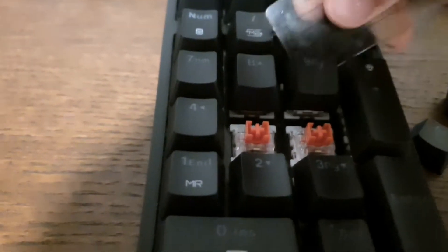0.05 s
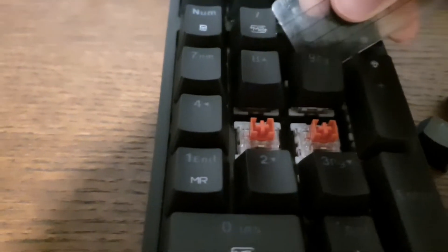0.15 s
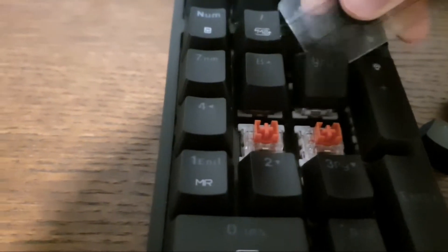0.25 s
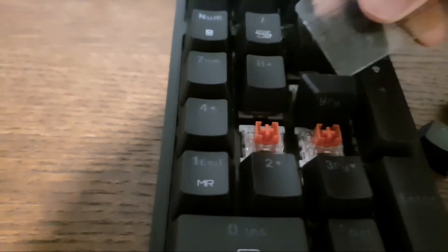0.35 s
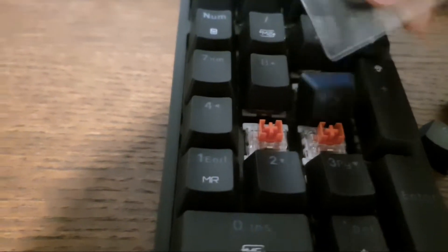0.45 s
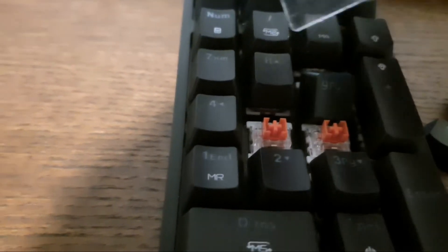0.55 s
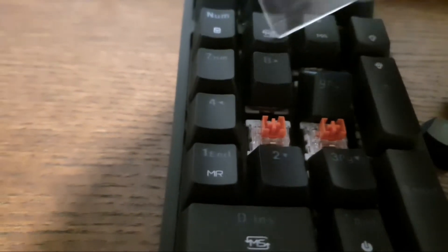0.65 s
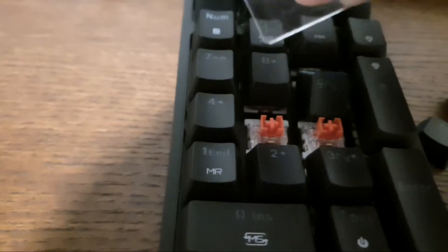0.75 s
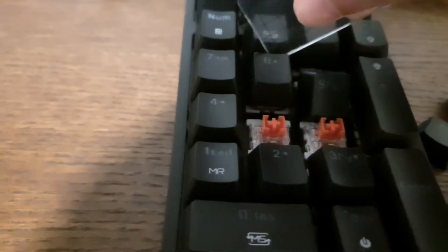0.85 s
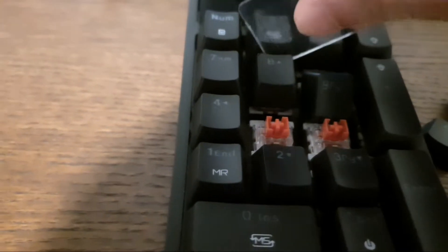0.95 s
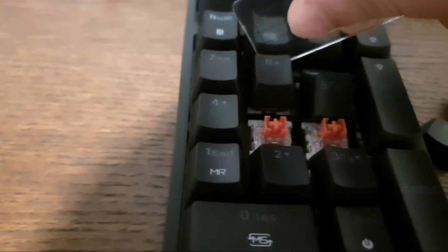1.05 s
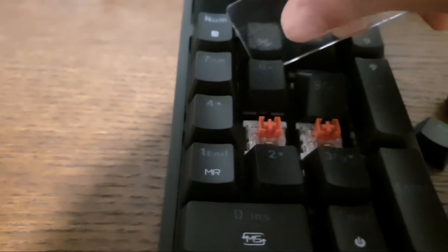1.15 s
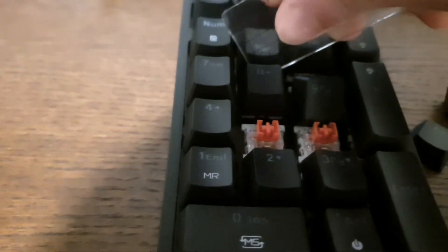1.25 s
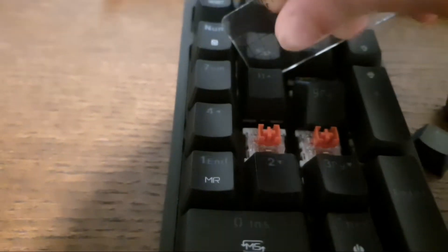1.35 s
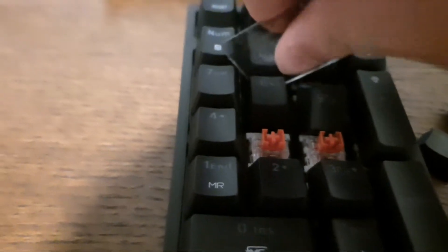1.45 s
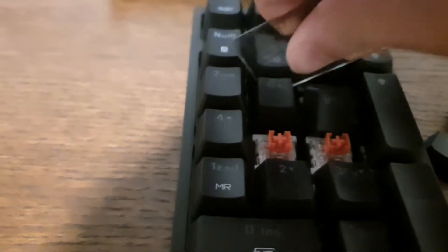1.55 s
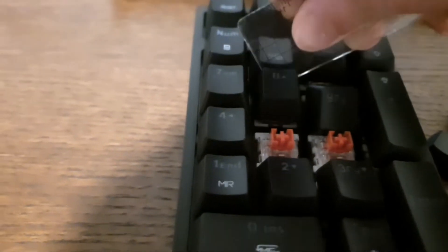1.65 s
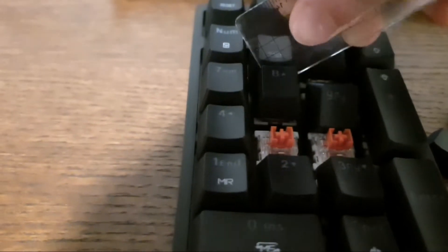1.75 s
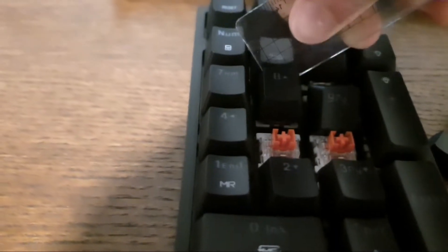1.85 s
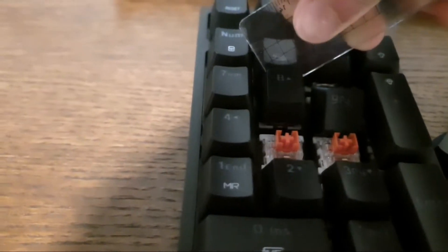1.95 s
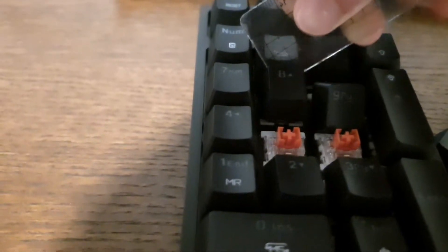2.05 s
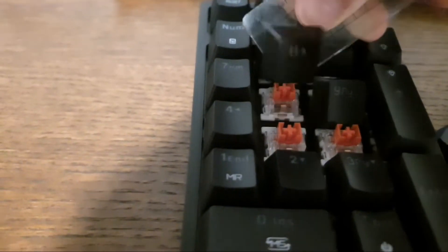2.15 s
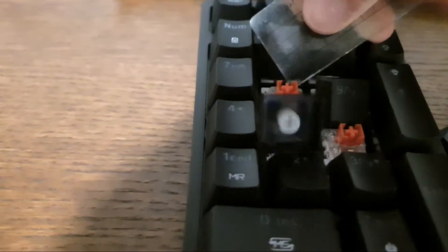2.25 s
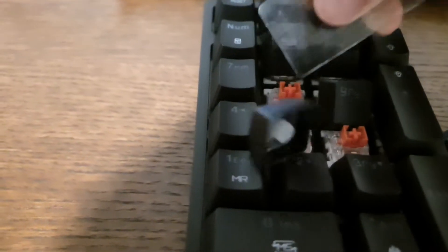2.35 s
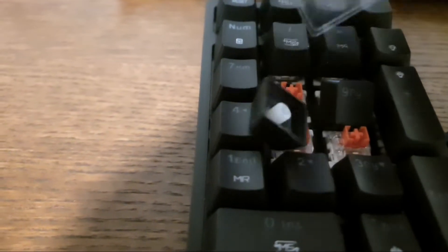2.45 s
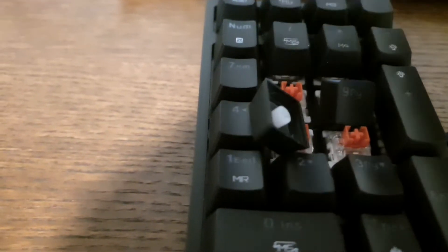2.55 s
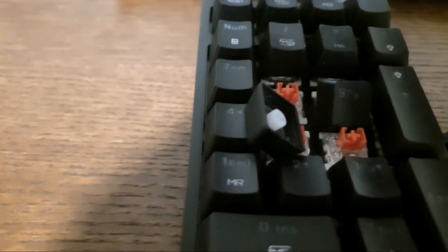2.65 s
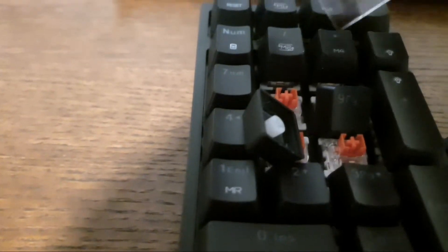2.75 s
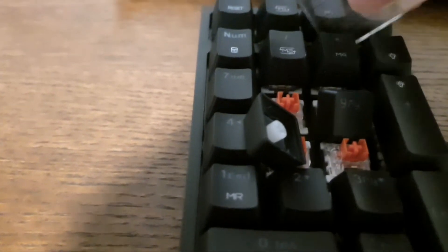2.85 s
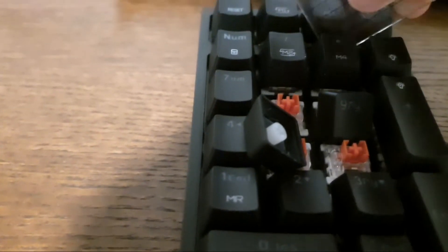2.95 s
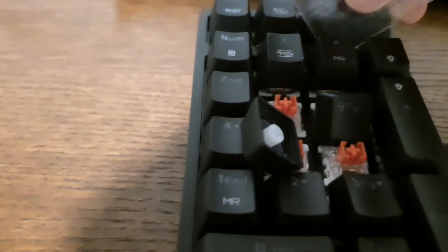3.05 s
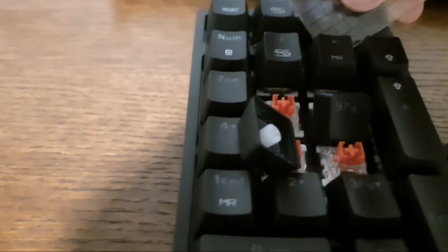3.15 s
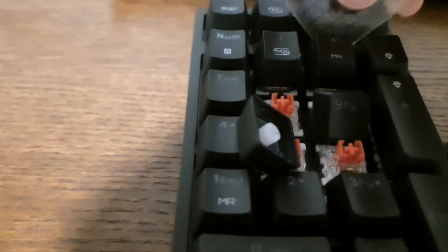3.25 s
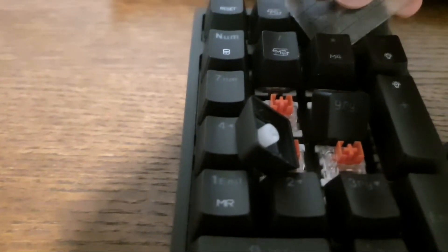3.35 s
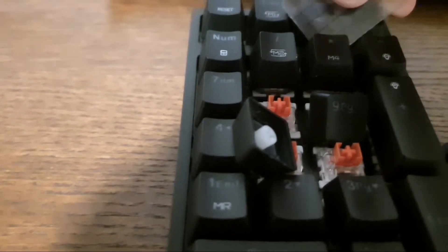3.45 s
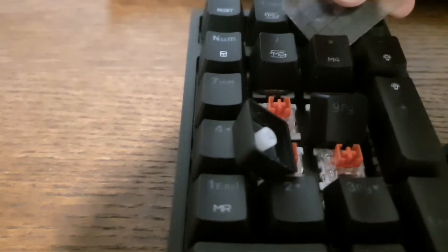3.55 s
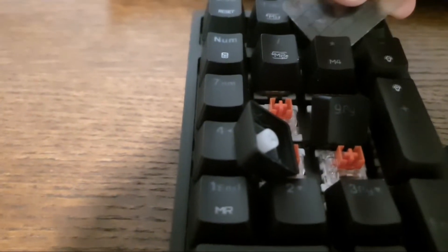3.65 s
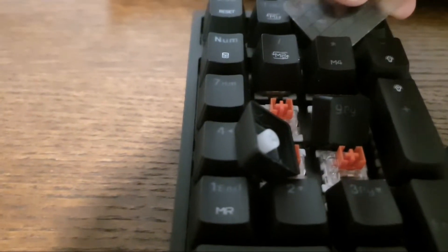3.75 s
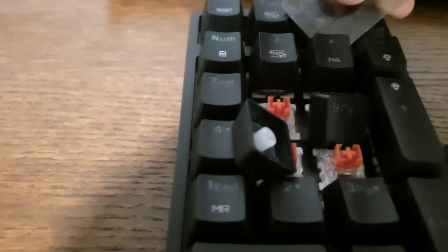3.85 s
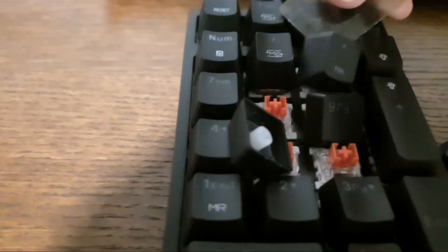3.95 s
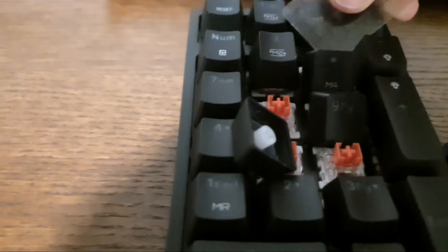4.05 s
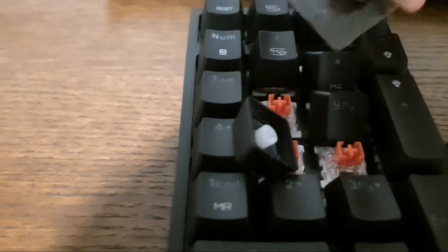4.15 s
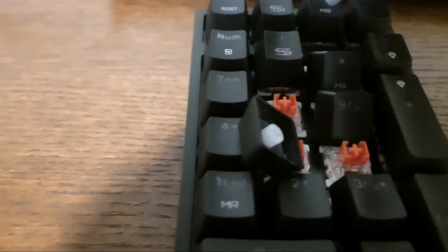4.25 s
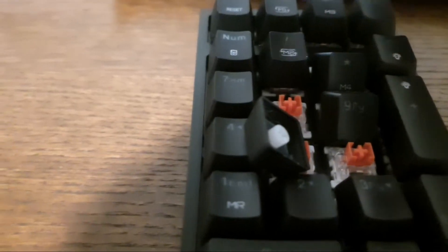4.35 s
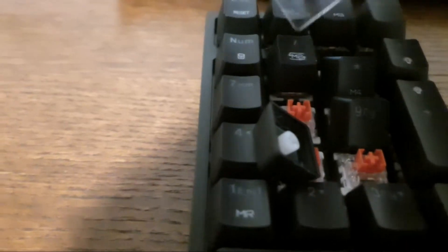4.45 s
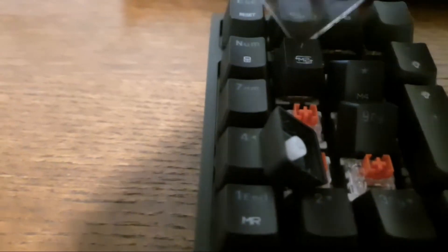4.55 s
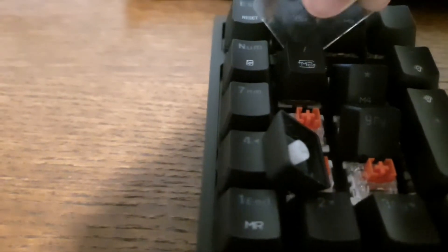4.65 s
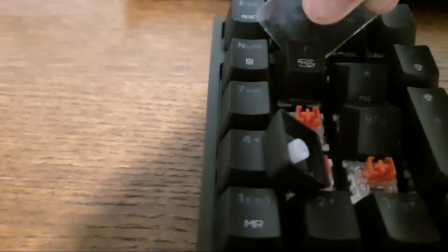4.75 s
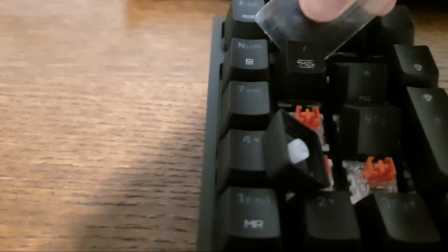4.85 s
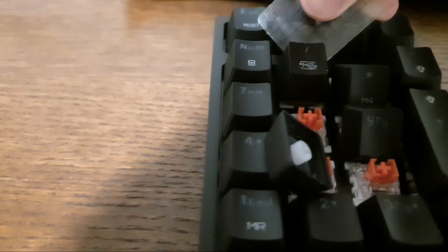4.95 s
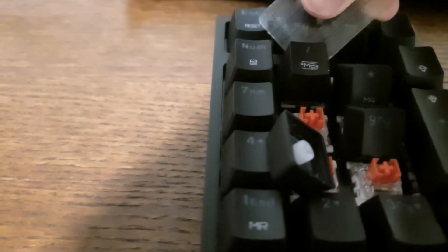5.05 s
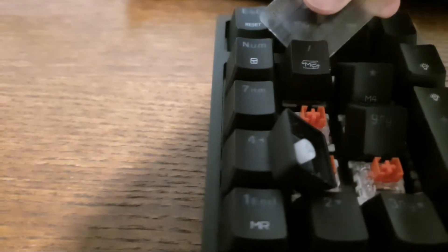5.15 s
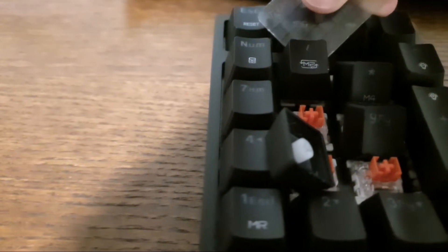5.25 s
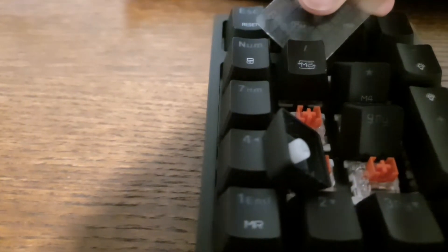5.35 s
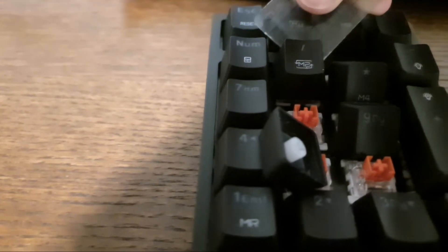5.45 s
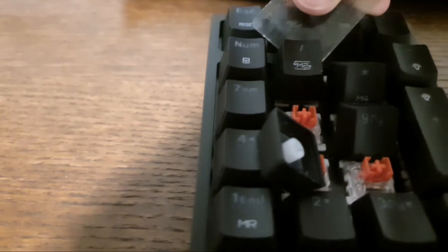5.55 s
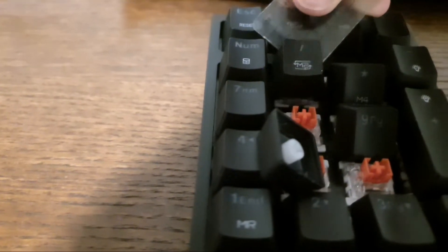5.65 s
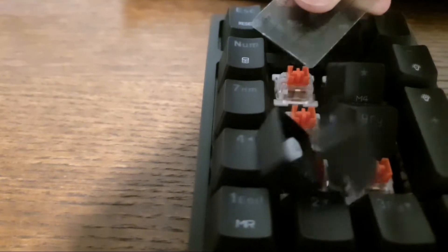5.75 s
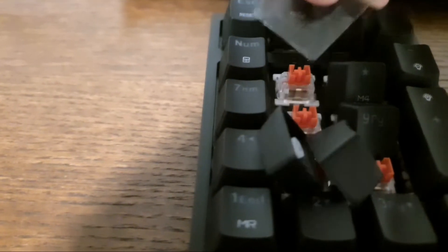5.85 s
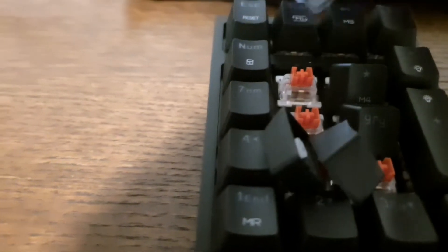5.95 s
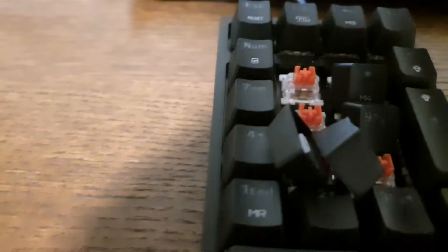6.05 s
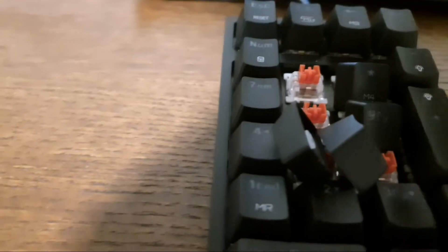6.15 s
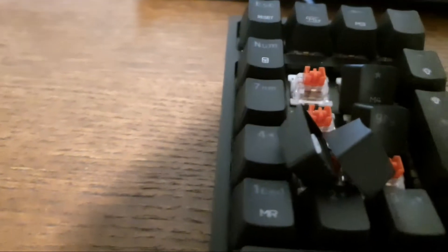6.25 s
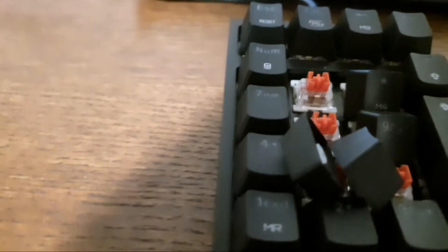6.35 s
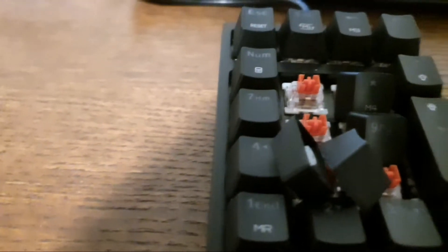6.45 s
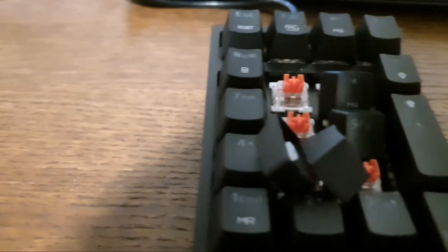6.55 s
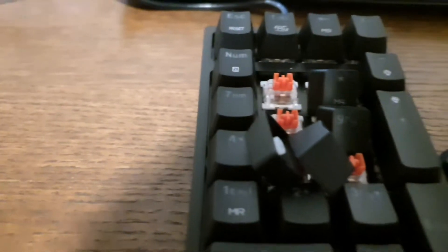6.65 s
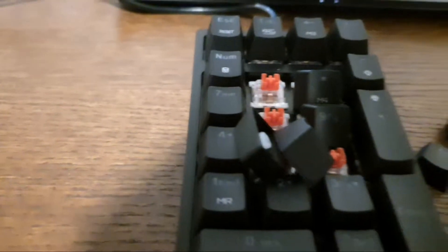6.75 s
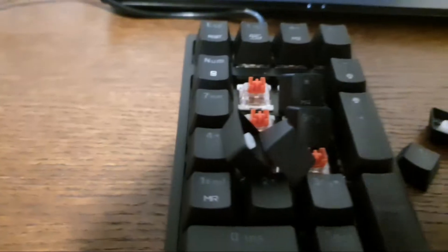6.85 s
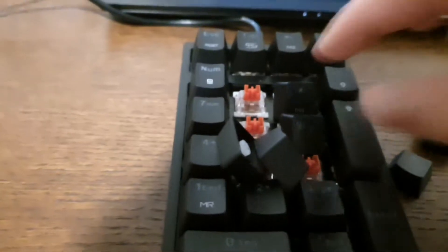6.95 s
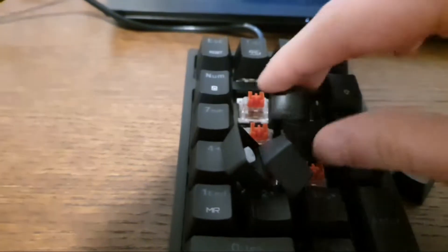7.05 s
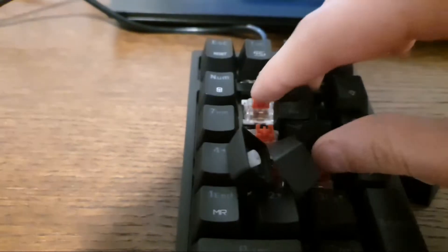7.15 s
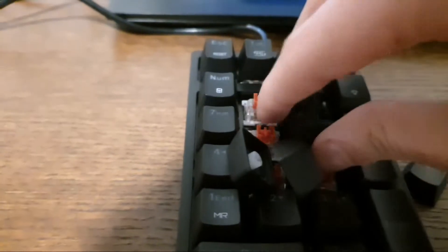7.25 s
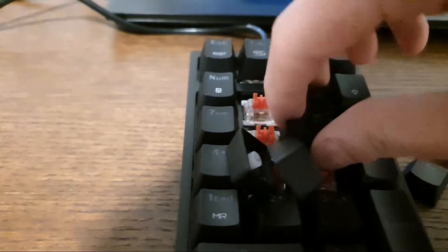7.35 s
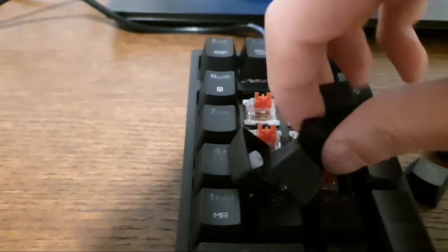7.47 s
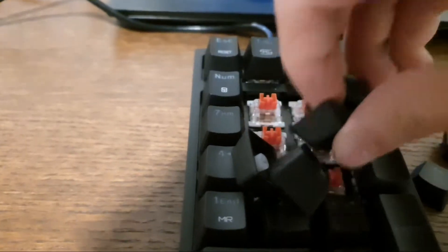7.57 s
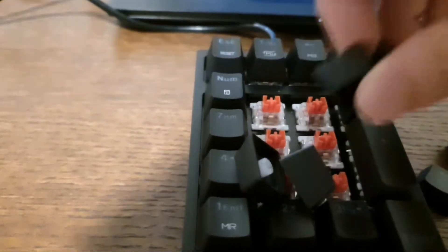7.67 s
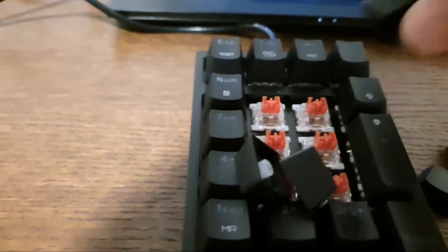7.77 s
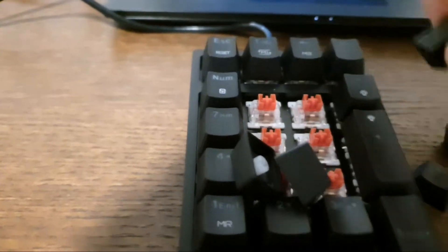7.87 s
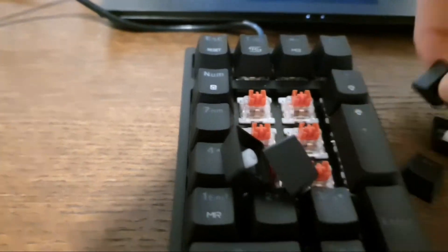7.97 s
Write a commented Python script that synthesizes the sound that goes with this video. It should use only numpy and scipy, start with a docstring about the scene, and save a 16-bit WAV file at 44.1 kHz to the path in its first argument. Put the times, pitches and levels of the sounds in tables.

```python
"""Keycaps are levered off a mechanical keyboard with a clear plastic card, close by in stereo.
Clicks are short noisy contacts that ring groups of decaying modes; scrapes are random slips through the same modes.
Thuds are decaying low desk modes, with filtered-noise rumble below; a few case notes are single fading sines.
A small room answers with decaying noise, over shaped hiss, low hum and a faint whine of wavering sines."""
import sys
import numpy as np
from scipy import signal
from scipy.fft import rfft, irfft
from scipy.io import wavfile
from scipy.ndimage import uniform_filter1d

SR = 44100
rng = np.random.default_rng(int(sys.argv[2]) if len(sys.argv) > 2 else 0)


def bounce(signal):
    """Save signal as a 16-bit WAV file at the path given by the first command-line argument."""
    frames = np.transpose(np.atleast_2d(signal))
    limited = np.clip(frames, -1, 1)
    pcm = np.round(limited * 32767).astype(np.int16)
    wavfile.write(sys.argv[1], SR, pcm)


N = 353196


def undb(db):
    """Gain of a level in dB."""
    return 10 ** (np.asarray(db) / 20)


def unit(x):
    """Scaled to rms 1."""
    return x / np.sqrt(np.mean(x ** 2))


def band(x, hz, width_hz):
    """One resonance, gain 1 at the centre."""
    return signal.lfilter(*signal.iirpeak(hz, hz / width_hz, fs=SR), x)


def curve(rows):
    """A level curve at every sample."""
    return np.interp(np.arange(N) / SR, *np.transpose(rows))


def along(table, hz):
    """A (f/Hz, value) table read on a log-frequency axis."""
    table = np.array(table)
    return np.interp(np.log(hz), np.log(table[:, 0]), table[:, 1])


def walk(rate_hz):
    """Random levels held for 1 / rate and slewed twice; spread near 1."""
    k = int(SR / rate_hz)
    steps = np.repeat(rng.standard_normal(N // k + 1), k)
    return 1.48 * uniform_filter1d(uniform_filter1d(steps, k), k)[:N]


def add(out, sound, s):
    """Mixes a sound in at time s."""
    i = int(s * SR)
    out[:, i:i + sound.shape[1]] += sound[:, :max(N - i, 0)]


# stereo balance of the keyboard: (f/Hz, left minus right level/dB)
LEFT_OVER_RIGHT = [(300, 0.5), (700, 8.5), (1500, 6.5), (3000, 8.5), (6000, 12.5), (9000, 3.5), (13000, 2)]


def lean(hz, off_db=0):
    """Gains of the two sides for a sound of the keyboard, which favours the left by frequency."""
    half_db = (along(LEFT_OVER_RIGHT, hz) + off_db) / 2
    return undb(half_db), undb(-half_db)


# hiss spectrum: (f/Hz, relative density level/dB per Hz)
HISS_SPECTRUM = [(18, -25), (30, -5), (64, 2.5), (165, -8), (210, 5), (259, -14.5), (328, -11.5),
                 (449, -16.5), (1430, -18), (2010, -19), (4910, -20.5), (14800, -21), (16000, -22)]
# how alike left and right hiss are: (f/Hz, likeness 0-1)
HISS_LIKENESS = [(60, 0.83), (300, 0.92), (700, 0.97), (3000, 1), (7000, 1), (15000, 1)]
# faint hum and whine, before their waver: (f/Hz, rms level/dB)
HUM_AND_WHINE = [(59.2, -62), (210, -82), (323, -89), (1868, -82.5), (4000, -85), (5000, -82.5),
                 (6000, -81), (7000, -79), (8000, -80.5), (9000, -81), (10000, -82.5), (11000, -81),
                 (15000, -85)]
HISS_DB = -58.5  # rms


def floor():
    """Smooth hiss, partly shared by both sides, with wavering hum and a whine mostly on whole kilohertz."""
    hz = np.maximum(np.fft.rfftfreq(N, 1 / SR), 1)
    alike = np.clip(along(HISS_LIKENESS, hz), 0, 1)
    noise = rfft(rng.standard_normal((2, N))) * undb(along(HISS_SPECTRUM, hz))
    mid, side = noise * np.sqrt([1 + alike, 1 - alike])
    hiss = irfft(np.array([mid + side, mid - side]), N)
    tones, t = np.zeros(N), np.arange(N) / SR
    for tone_hz, db in HUM_AND_WHINE:
        level = undb(db + 2.1 * walk(6.5)) * np.sqrt(2)  # a sine peaks at sqrt(2) times its rms
        tones += level * np.sin(2 * np.pi * (tone_hz * t + rng.random()))
    return undb(HISS_DB) * unit(hiss) + tones


# rumble without the thuds' share: (t/s, rms level/dB)
RUMBLE = [(0.0, -47.5), (2.0, -56.5), (2.6, -60.5), (3.9, -53.5), (4.3, -62), (5.8, -53.5), (6.15, -65.5),
          (7.0, -66.5), (7.46, -46), (8.0, -75)]
# broad desk resonances, each filtered twice: (f/Hz, width of one pass/Hz, relative level/dB)
DESK_RESONANCES = [(40.2, 21, -15.5), (62, 29.4, -4), (98.5, 58, -5.5), (192, 74, -10.5), (345, 150, -15.5),
                   (504, 320, -18.5)]
SHAKE_AFTER_DB, SHAKE_AFTER_T60_S = -21.5, 0.41  # rumble left by a thud, against its peak


def shake():
    """Uneven low rumble through the desk's broad resonances, stirred up by every thud."""
    shared_db, rumble = 1.5 * walk(12), np.zeros(N)
    for hz, width_hz, db in DESK_RESONANCES:
        mode = unit(band(band(rng.standard_normal(N), hz, width_hz), hz, width_hz))
        rumble += undb(db + 3 * walk(22) + shared_db) * mode
    stirred, t = np.zeros((1, N)), np.arange(SR) / SR
    for s, db, _ in DESK_THUDS:
        add(stirred, undb(db + SHAKE_AFTER_DB - 60 * t[None] / SHAKE_AFTER_T60_S), s)
    return unit(rumble) * (undb(curve(RUMBLE)) + stirred[0])


def swell(rise_s, fall_s):
    """Level that builds, then eases off."""
    ends = np.cumsum([0, max(rise_s, .002), max(fall_s, .01)])
    return np.interp(np.arange(int(ends[-1] * SR)) / SR, ends, [0, 1, 0]) ** 1.5


def gripped(modes, sides):
    """Slips through a group of modes, widened by the grip of the fingers."""
    body = np.zeros((2, N))
    for hz, db, _ in modes:
        mode = band(band(sides, hz, 0.12 * hz), hz, 0.24 * hz)
        body += undb(db) * np.array(lean(hz))[:, None] * mode
    return body


# scrapes of card and fingers: (start t/s, length/s, dull part level at full pressure/dB, treble level above it/dB)
SCRAPES = [(0.042, .08, -47, -15), (0.246, .09, -51.5, -11), (0.315, 0.14, -44, -9), (.5, .13, -43, -19),
           (0.78, 0.38, -54, -23), (1.288, 0.076, -49.5, -19), (1.441, 0.081, -42, -8),
           (2.333, 0.3, -47.5, -27), (2.893, 0.069, -46.5, -9), (3.034, 0.15, -56.5, -27),
           (3.923, 0.14, -44, -6), (4.029, 0.096, -40, -25), (4.141, 0.079, -42.5, -16),
           (4.193, 0.058, -38.5, -17), (4.573, 0.063, -44, -14), (4.677, 0.053, -52, -10),
           (4.754, 0.096, -41.5, -9), (5.373, 0.35, -55.5, -27), (5.819, 0.13, -42.5, -17),
           (6.485, 0.19, -38.5, -9.5), (6.652, 0.051, -34, 8), (6.681, 0.078, -38.5, 9.5),
           (7.175, 0.23, -50.5, -8.5), (7.366, 0.28, -45.5, -9), (7.548, 0.1, -44.5, -0.5),
           (7.644, 0.11, -45, -9)]
RUB_RISE_SHARE = 0.57  # part of a scrape in which the pressure builds
BEFORE_S, AFTER_S = 0.016, 0.082  # a short soft noise swells before each click and fades after it
# that noise against the clack; the duller the click, the less treble
AFTER_DB, AFTER_TREBLE_DB = -24.5, -8


def rub():
    """Dense uneven slips, in flurries, excite the keyboard's modes, in scrapes and softly around each click."""
    flurry_db = 3.5 * walk(160) + 3 * walk(45)
    happens = rng.random(N) < 5000 / SR  # 5000 slips a second on average
    slips = happens * undb(1.97 * np.minimum(rng.exponential(size=N), 4) + flurry_db)
    # partly the same on both sides
    sides = slips * (0.88 * rng.standard_normal(N) + rng.standard_normal((2, N)))
    dull = unit(gripped(KNOCK_MODES, sides) + gripped(CLACK_MODES + CLICK_MODES[:2], sides))
    sharp = unit(gripped(CLICK_MODES[2:], sides) + undb(-4.0) * gripped(TICK_MODES, sides))
    # the push also reaches the desk
    dull = dull + undb(-11.5) * unit(band(band(sides.mean(axis=0), 146, 116), 244, 145))
    strokes = []
    for s, long_s, db, treble_db in SCRAPES:
        strokes.append((s, RUB_RISE_SHARE * long_s, (1 - RUB_RISE_SHARE) * long_s, db, treble_db))
    for s, db, _, sharp_db in PLASTIC_CLICKS:
        strokes.append((s - BEFORE_S, BEFORE_S, AFTER_S, db + AFTER_DB, AFTER_TREBLE_DB + sharp_db))
    press = np.zeros((2, N))  # rows: dull, sharp
    for s, rise_s, fall_s, db, treble_db in strokes:
        add(press, np.outer(undb([db, db + treble_db]), swell(rise_s, fall_s)), s)
    return press[0] * dull + press[1] * sharp


# noise bands of the room's tail: (f/Hz, width/Hz, t60/s, starting level/dB)
ROOM_BANDS = [(473, 383, 0.27, -28), (1940, 1100, 0.26, -39), (4850, 3200, 0.2, -43.5),
              (11200, 14500, 0.41, -46)]


def room(x):
    """Dense echoes that build within milliseconds and die band by band, unrelated left and right."""
    t = np.arange(SR // 2) / SR
    tail = np.zeros((2, len(t)))
    for hz, width_hz, t60_s, db in ROOM_BANDS:
        tail += undb(db - 60 * t / t60_s) * band(rng.standard_normal((2, len(t))), hz, width_hz)
    return signal.fftconvolve(x, tail * (1 - np.exp(-t / 0.002)), axes=1)[:, :N]


HELD_SHARE, HELD_DB = 0.4, 6  # modes damped by fingers and neighbours: shortest share of t60, and their gain
APART_HZ = 1490  # below this the two sides hear a mode nearly in step


def ring(modes, contact, count, off_db, lag_s, scatter_db=3.0, detune=0.075, apart_rad=1.23):
    """A contact rings close groups of modes; each blow lands elsewhere, so sizes, pitches and paths differ."""
    hz, db, t60 = np.repeat(modes, count, axis=0).T[:, :, None]
    size, tune, turn, apart = rng.standard_normal((4, len(hz), 1))
    t = np.arange(int(SR * t60.max())) / SR
    hz = hz * (1 + detune * tune)
    held = rng.random(hz.shape)
    db, t60 = db + HELD_DB * held, t60 * HELD_SHARE ** held
    # a mode needs about a cycle to build up
    fade = undb(db + scatter_db * size - 60 * t / t60) * (1 - np.exp(-2.5 * hz * t))
    gap = 2 * np.pi * hz * lag_s + apart_rad * apart * hz / (hz + APART_HZ)
    left, right = lean(hz, off_db)
    phase = 2 * np.pi * (hz * t + 0.23 * turn)
    left_sum = np.sum(left * fade * np.sin(phase), axis=0)
    right_sum = np.sum(right * fade * np.sin(phase - gap), axis=0)
    pair = signal.fftconvolve(np.array([left_sum, right_sum]), contact[None], axes=1)
    return pair / np.abs(pair.mean(axis=0)).max()


# plastic on plastic: (t/s, clack peak level/dB, knock level above it/dB, sharpness/dB)
PLASTIC_CLICKS = [(.0872, -39, 0, 0), (.0937, -40, -2.5, 0), (0.2924, -44.5, -1, -0.5),
                  (0.3084, -41.5, -2.5, -5), (.3676, -41, -13, -1), (0.3855, -33.5, -5, -1),
                  (0.4054, -27, -27, 5.5), (.4189, -29.5, -31, 1.5), (.4334, -20.5, -20, 0.5),
                  (0.5193, -33, -22, -0.5), (0.5326, -32, -27, 2.5), (.5427, -35, -25, 4),
                  (0.557, -42, -10, 2), (.5714, -42, -7, 3), (.5906, -44, -22, 5),
                  (0.6013, -41.5, -14, 6.5), (0.7185, -32, -9, -6.5), (0.7949, -30.5, -21, -8),
                  (.827, -42.5, 3, 3), (0.8584, -15.5, -13, 0.5), (1.034, -49.5, 6, -6),
                  (1.0565, -43, -1, -10), (1.2403, -46, 7.5, -8), (1.3072, -45.5, 1.5, -5),
                  (1.3297, -45, -5, 1.5), (1.3468, -39.5, -5, -2), (1.4676, -39, 7, -12),
                  (1.4852, -35.5, 6.5, -5), (1.5015, -24, 0, -18), (1.6034, -38, -3, -11),
                  (1.6457, -31, -5.5, -2.5), (1.7735, -43, 7, -13), (2.0763, -40.5, 3.5, 0.5),
                  (2.1813, -21.5, -8.5, 0.5), (2.2263, -40, -7, 1.5), (2.2937, -35.5, -4, 16.5),
                  (2.3137, -32.5, -33, -1), (2.432, -35, -15, -3), (2.4593, -31, -32, 3),
                  (2.4742, -31, -29, 8), (2.4836, -28.5, -32, -4.5), (2.5198, -37, -18, 7.5),
                  (2.581, -32.5, -22, -5), (2.61, -37, -37, 5), (2.6426, -39.5, -26, -24),
                  (2.9013, -33.5, -5, -14), (2.9139, -26.5, -29, -21), (2.9314, -32, -17, -3.5),
                  (3.0722, -40.5, -14, -2.5), (3.117, -40, -6, -7), (3.326, -42.5, -0.5, -11),
                  (3.9672, -25, -3, -1), (4.019, -38, -4, -1), (4.0374, -28.5, -11, -2),
                  (4.0652, -26.5, -8.5, -3.5), (4.0721, -24.5, -19, -1.5), (4.0841, -35, -6, 4.5),
                  (4.158, -36.5, 2.5, -16), (4.2143, -31, -10, 0.5), (4.2195, -29.5, -14, 0),
                  (4.2429, -39, 3, 2), (4.58, -40.5, -9, 0.5), (4.6171, -32.5, -4.5, -4.5),
                  (4.6564, -21, -35, -14.5), (4.688, -30, -10, -21), (4.7014, -37, -6, -4),
                  (4.7592, -27, -8, -20), (4.794, -23.5, -7, -30), (4.8283, -19, -5, -10.5),
                  (4.9295, -39, -5, -20), (5.01, -38, -5.5, -24), (5.7318, -24.5, 0, 4),
                  (5.8214, -27.5, -25, 8.5), (5.8324, -30.5, -22, 7), (5.8365, -23.5, -36, 11),
                  (5.8746, -34, -26, 5), (5.9239, -23.5, -33, -3.5), (5.9314, -30, -8, -4),
                  (5.9463, -30.5, 0.5, 3.5), (5.98, -35, -10, -2), (6.1993, -43.5, 0.5, -11),
                  (6.5088, -41, 0.5, -2), (6.549, -37, 7.5, -4), (6.566, -33, -1, -6),
                  (6.6582, -20.5, -12, 10.5), (6.6624, -26, -20, 9.5), (6.6754, -28, -25, 6),
                  (6.6925, -33, -30, 13), (6.7014, -22, -14, 9.5), (7.0778, -35, -5, 3),
                  (7.1207, -27, -9, -0.5), (7.1803, -44.5, -15, 2.5), (7.3492, -40, -8, 3.5),
                  (7.3637, -28, -17, 4), (7.418, -35, -16, 2), (7.428, -40, -13, 4.5),
                  (7.475, -37.5, -3, 0), (7.5846, -35, -16, -6), (7.5943, -34, -10, 4),
                  (7.616, -35, -15, 4.5), (7.677, -40.5, -3, 4.5), (7.6974, -40, -5, 5),
                  (7.7078, -32.5, -6, 3)]
# what caps and case ring with, low to high, before scatter and damping: (f/Hz, relative level/dB, t60/s)
KNOCK_MODES = [(364, -2.5, 0.028), (456, -8.5, 0.025), (527, -3.5, 0.017), (680, 0, 0.013),
               (828, -3.5, 0.017)]
CLACK_MODES = [(1089, 1, 0.0054), (1291, 1.5, 0.021), (1548, -3, 0.0061), (1938, -2, 0.007),
               (2112, 1, 0.027), (2500, -6, 0.01)]
CLICK_MODES = [(2954, -2, 0.019), (3340, -6, 0.025), (3764, -6, 0.014), (4550, 2, 0.0056),
               (5060, -5, 0.0093), (5645, -3.5, 0.004)]
TICK_MODES = [(6460, 1.5, 0.0018), (7300, -7, 0.012), (7400, 1, 0.0081), (8540, -6, 0.0084),
              (9450, -3, 0.001), (11020, -7, 0.016), (13900, -19, 0.0021)]
# sharpness lifts the click modes dB for dB and the tick modes more steeply
TICK_DB, TICK_PER_DB = -6, 1.6355
RATTLE_T60_S, RATTLE_SPREAD = 0.0089, 0.42  # median, and spread of its natural log
TOUCH, RATTLE_RISE_S = 6.4, 0.0017  # size of the first touch against the rattle


def clicks():
    """Each click is a first touch and a rattle of a few milliseconds that ring case, cap and card."""
    out, t = np.zeros((2, N)), np.arange(900) / SR
    for s, db, knock_db, sharp_db in PLASTIC_CLICKS:
        rattle_s = np.clip(RATTLE_T60_S * np.exp(RATTLE_SPREAD * rng.standard_normal()), .002, .04)
        contact = rng.standard_normal(len(t)) ** 3  # cubing makes it spiky
        contact = contact * (1 - np.exp(-t / RATTLE_RISE_S)) * undb(-60 * t / rattle_s)
        contact[0] = TOUCH
        # where the blow lands sets the balance and how much sooner the left side hears it
        off_db, lag_s = rng.standard_normal(2) * (2.5, .00003) + (0, .00006)
        tick_db = TICK_DB + TICK_PER_DB * sharp_db
        parts = ((KNOCK_MODES, knock_db), (CLACK_MODES, 0), (CLICK_MODES, sharp_db), (TICK_MODES, tick_db))
        for modes, part_db in parts:
            add(out, undb(db + part_db) * ring(modes, contact, off_db=off_db, lag_s=lag_s, count=6), s)
    return out


# hands and keyboard bump the desk: (push t/s, peak level/dB, centre of the favoured modes f/Hz)
DESK_THUDS = [(0.398, -43, 203), (0.629, -47.5, 149), (0.855, -33.5, 97), (1.226, -37, 113),
              (1.29, -38, 77), (1.498, -22, 88.5), (1.769, -39, 191), (2.074, -27, 115), (2.181, -28, 126),
              (2.258, -32.5, 100), (2.477, -42, 120), (2.758, -45, 73.5), (2.903, -34.5, 84),
              (3.116, -37, 117), (3.335, -25, 149), (3.493, -22, 145), (3.538, -21, 91), (3.943, -30.5, 94),
              (4.068, -33, 203), (4.212, -39, 118), (4.558, -35.5, 218), (4.653, -32, 98),
              (4.762, -24, 107), (4.788, -24, 190), (4.822, -17, 105), (5.128, -44.5, 89),
              (5.194, -43, 130), (5.344, -22.5, 89), (5.732, -31.5, 96), (5.739, -38.5, 320),
              (5.833, -39, 185), (5.926, -34, 138), (6.508, -35.5, 91.5), (6.654, -36, 230),
              (6.692, -29.5, 111), (7.083, -33, 96), (7.279, -44, 90.5), (7.353, -33.5, 94),
              (7.572, -44, 96), (7.702, -43, 187)]
# desk modes before detuning: (f/Hz, relative level/dB, t60 as a share of the thud's)
DESK_MODES = [(43.4, -17, 0.91), (84, 1.5, 1.13), (119, -0.5, 1.09), (167.7, 1, 0.73), (237, -8, 0.75),
              (310, -2.5, 0.39)]
THUD_T60_S = .105


def thuds():
    """A soft push rings the desk modes near its pitch most; the low ones last, the same on both sides."""
    out, t = np.zeros((2, N)), np.arange(12000) / SR
    hz, db, share = np.transpose(DESK_MODES)[:, :, None]
    for s, peak_db, pitch_hz in DESK_THUDS:
        near_db = -9.0 * np.log2(hz / pitch_hz) ** 2
        tune = 1 + 0.056 * rng.standard_normal(hz.shape)
        fade = undb(db + near_db - 60 * t / (share * THUD_T60_S))
        blow = -np.sum(fade * np.sin(2 * np.pi * hz * tune * t), axis=0)
        blow = blow * (1 - np.exp(-(t / 0.0029) ** 2))
        # the desk takes a moment to give
        add(out, undb(peak_db) * blow[None] / np.abs(blow).max(), s + 0.0041)
    return out


# one clear note of the case rings on: (t/s, level before rise, fade, stereo balance and waver/dB)
CASE_NOTES = [(.875, -40.5), (1.495, -39.5), (4.83, -50), (6.54, -40), (6.566, -40), (6.66, -45)]
NOTE_HZ, NOTE_T60_S, NOTE_WAVER_DB = 681, 0.34, 1


def notes():
    """One mode of the case that swells for a moment, wavers and fades."""
    out, t = np.zeros((2, N)), np.arange(SR // 2) / SR
    note = np.sin(2 * np.pi * NOTE_HZ * t) * (1 - np.exp(-t / 0.0052)) * undb(-60 * t / NOTE_T60_S)
    for s, db in CASE_NOTES:
        add(out, undb(db) * np.outer(lean(NOTE_HZ), note), s)
    return out * undb(NOTE_WAVER_DB * walk(70))


def scene():
    """Keyboard close by, its echo in the room, desk and background."""
    keys = clicks() + rub()
    return keys + room(keys) + notes() + thuds() + shake() + floor()


TOP_HZ = 15700


def record(dry):
    """The recorder cuts the top with a steep low-pass."""
    low_pass = signal.ellip(10, .2, 70, TOP_HZ, fs=SR, output="sos")
    return signal.sosfilt(low_pass, dry)


dry = scene()
out = record(dry)
bounce(out)
```